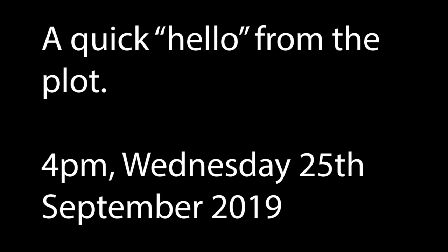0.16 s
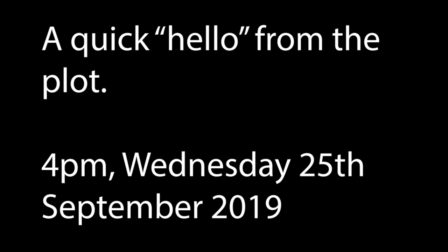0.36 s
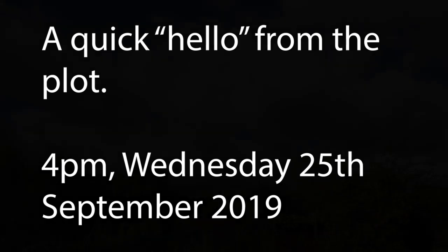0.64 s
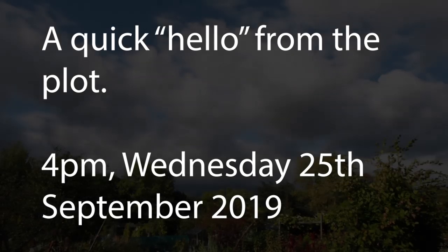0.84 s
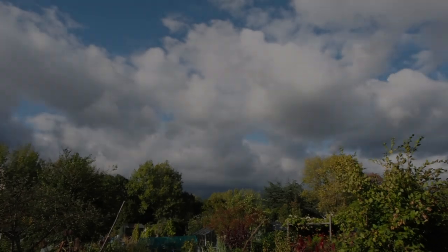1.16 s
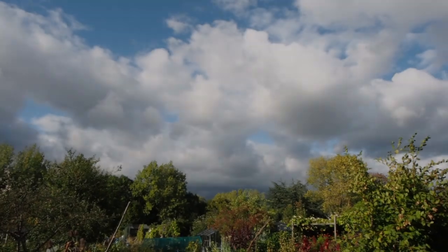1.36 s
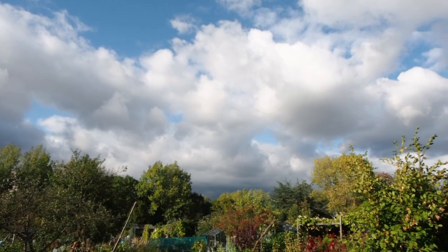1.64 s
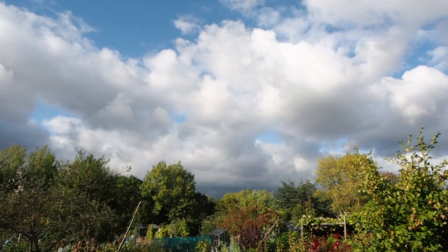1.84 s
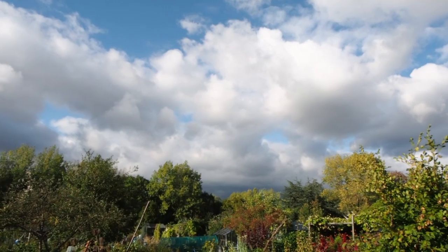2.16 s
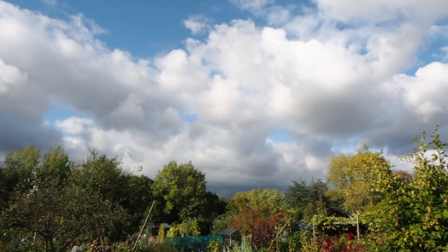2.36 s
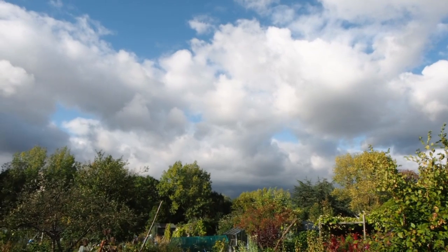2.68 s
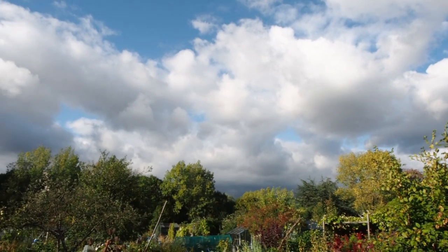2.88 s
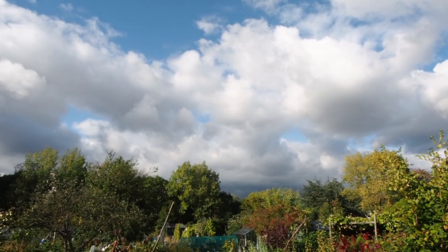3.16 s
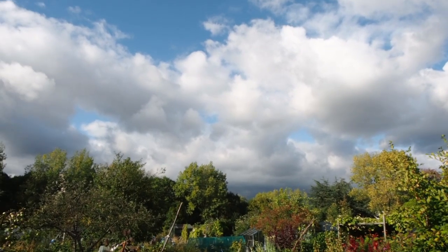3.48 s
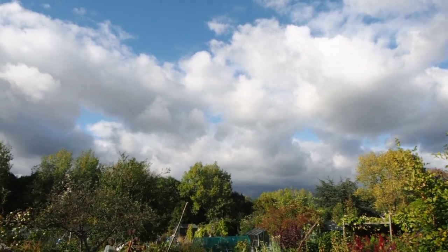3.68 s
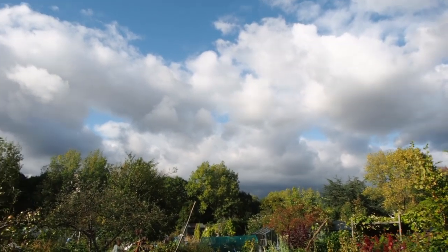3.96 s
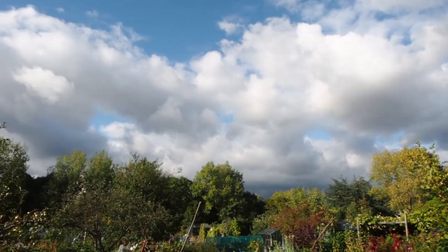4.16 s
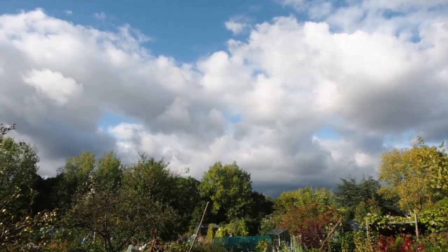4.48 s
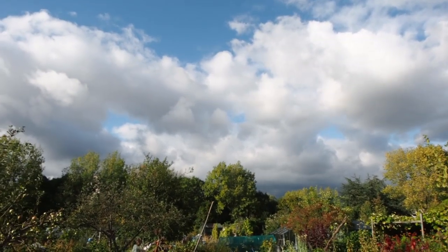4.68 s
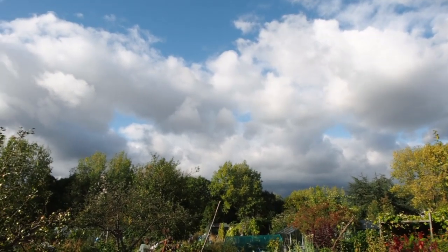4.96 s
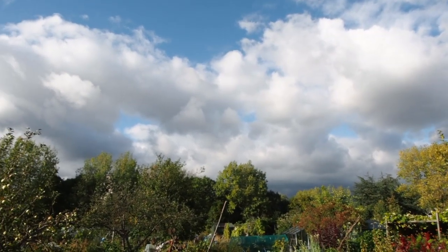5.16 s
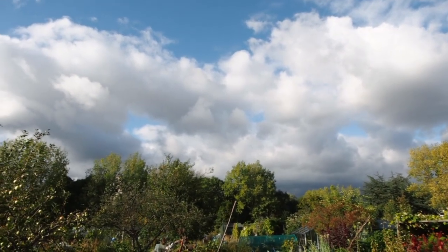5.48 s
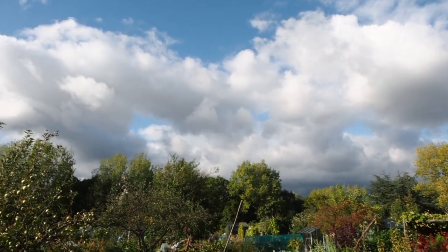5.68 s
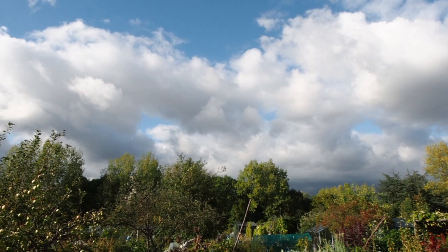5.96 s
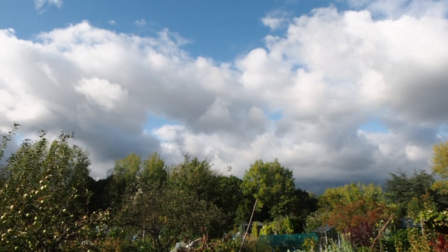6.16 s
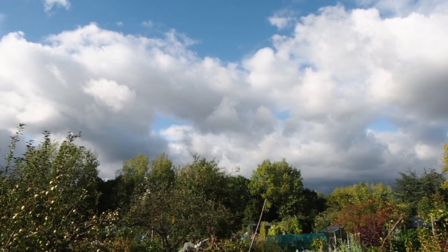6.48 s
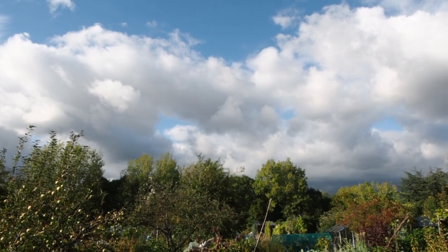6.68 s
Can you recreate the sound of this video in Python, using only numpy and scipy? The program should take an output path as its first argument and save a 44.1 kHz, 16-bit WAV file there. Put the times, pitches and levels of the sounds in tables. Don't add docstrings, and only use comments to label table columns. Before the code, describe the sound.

After brief silence, low wind buffeting fades in over rustling trees and faint far traffic, then calms, with a few tiny bird chirps.

```python
import sys
import numpy as np
from scipy import signal
from scipy.io import wavfile
from scipy.ndimage import uniform_filter1d

SR = 44100
rng = np.random.default_rng(int(sys.argv[2]) if len(sys.argv) > 2 else 0)


def natural_amplitude(level_db):
    exponent = np.asarray(level_db, float) / 20
    return 10 ** exponent


def inscribe(sig):
    pcm = np.round(np.clip(np.atleast_2d(sig).T, -1, 1) * 32767)
    wavfile.write(sys.argv[1], SR, pcm.astype(np.int16))


N = 301203
FRAME, HOP = 1024, 256


def evened(x):
    return x / np.sqrt(np.mean(x ** 2) + 1e-20)


def read(points, hz):
    table_hz, value = np.transpose(points)
    return np.interp(np.log(hz + 1), np.log(table_hz + 1), value)


def follow(rows):
    s, *columns = np.transpose(rows)
    return np.array([np.interp(np.arange(N) / SR, s, column) for column in columns])


def add(mix, s, sound):
    part = mix[round(s * SR):][:len(sound)]
    part += sound[:len(part)]


def wander(ms):
    size = max(int(ms * SR / 1000), 2)
    noise = rng.standard_normal((2, N))
    return evened(uniform_filter1d(uniform_filter1d(noise, size), size))


# frequency in Hz, gain in dB.
PORT_COLOUR = [(4000, -0.5), (7000, -1.5), (8400, 1.5), (10500, 0.5), (13000, -0.5)]


def airy(colour, same, right_leads, patchy_db, tilt_db):
    frames = N // HOP + 5
    hz = np.fft.rfftfreq(FRAME, 1 / SR)
    a, b, c, d, patches = rng.standard_normal((frames, len(hz), 5)).T
    patches = uniform_filter1d(patches, size=14, axis=0)
    patches = evened(uniform_filter1d(patches, size=12, axis=1))

    left = a + 1j * b
    unrelated = c + 1j * d
    like = np.clip(read(same, hz), 0, 1)[:, None]
    early = np.exp(2j * np.pi * hz * right_leads / SR)[:, None]
    spectra = np.array([left, like * early * left + np.sqrt(1 - like ** 2) * unrelated])
    spectra[1] *= natural_amplitude(read(PORT_COLOUR, hz))[:, None]

    octaves = np.log2(hz[:, None] / 4000 + 0.078)
    tilt = octaves * np.interp(np.arange(frames) * HOP, np.arange(N), tilt_db)
    spectra *= natural_amplitude(read(colour, hz)[:, None] + patchy_db * patches + tilt)
    return evened(signal.istft(spectra, nperseg=FRAME, noverlap=FRAME - HOP)[1][:, :N])


# middle in seconds, half length in seconds, strength in dB.
PUFFS_LEFT = [(.9, 0.091, -36), (1.05, 0.032, -30.5), (1.14, 0.098, -31), (1.28, 0.033, -30),
              (1.41, 0.057, -28.5), (1.57, .05, -34), (1.69, .025, -28.5), (1.78, .04, -50),
              (1.87, 0.043, -40), (1.99, 0.042, -37), (2.07, .02, -37), (2.18, 0.074, -28.5),
              (2.3, 0.036, -33), (2.38, 0.045, -35.5), (3.14, 0.097, -33), (3.47, 0.095, -33.5),
              (3.65, 0.087, -36), (3.87, 0.065, -41.5), (4.7, .1, -60), (5.5, .02, -42), (5.59, .04, -45),
              (5.72, 0.032, -39), (5.83, 0.053, -37.5), (6.1, 0.052, -36), (6.22, 0.042, -42),
              (6.35, 0.043, -42.5), (6.52, .02, -44.5), (6.63, 0.085, -41.5)]
PUFFS_RIGHT = [(1.06, .1, -48), (1.55, 0.26, -45), (2.05, 0.056, -36.5), (2.32, 0.045, -38),
               (2.8, .03, -48), (2.93, 0.098, -35.5), (3.12, 0.052, -26), (3.22, .05, -29.5),
               (3.33, 0.1, -35), (3.6, 0.065, -36), (3.76, 0.063, -42), (3.92, .08, -39),
               (4.12, 0.042, -45), (4.58, 0.037, -42), (5.05, .1, -63), (5.8, 0.17, -55), (6.25, 0.16, -55),
               (6.75, .06, -60)]


def wind_db():
    calm_db = -67
    t = np.arange(0, N, HOP) / SR
    strength = []
    for puffs in (PUFFS_LEFT, PUFFS_RIGHT):
        power = natural_amplitude(2 * calm_db)
        for middle, half, db in puffs:
            power = power + natural_amplitude(2 * db) * np.exp(-((t - middle) / half) ** 2 * 2)
        strength.append(np.interp(np.arange(N) / SR, t, 10 * np.log10(power)))
    return np.array(strength)


def eddy(level_db, hz, ms, luck):
    t = np.arange(-1500, 1500) / SR
    width = 0.47 * np.sqrt(max(ms ** 2 - 30, 9)) / 1000
    glide = 1 + 0.29 * (luck[0] - .5) * t / width
    turn = 2 * np.pi * (hz * t * glide + luck[1])

    def burst(phase, spread):
        return np.cos(phase) * np.exp(-.5 * (t / spread) ** 2)

    swirl = burst(turn, width)
    edge = burst(2 * turn + 6.6 * luck[2], min(0.76 * width, .0022))
    crest = burst(3.16 * turn + 7.1 * luck[3], min(.5 * width, .0012))
    push = burst(0.54 * turn + 5.1 * luck[4], 1.47 * width)
    sharp = natural_amplitude(0.16 * (level_db + 29.5))
    pulse = swirl + 0.3 * sharp * edge + 0.14 * sharp ** 0.88 * crest + 0.53 * push
    return natural_amplitude(level_db + 3.5) * pulse


def small_eddies(strength_db):
    gap_s, low_hz, high_hz = .017, 124, 250
    over_db, scatter_db, cycles = 3.5, 13.5, 1.73
    octaves_per_db = 0.05
    slots = np.arange(10 * gap_s, N / SR - 2 * gap_s, gap_s)
    late, weak, pitch, long = rng.random((len(slots), 4)).T
    s = slots + late * gap_s
    here_db = strength_db[(s * SR).astype(int)]
    hz = low_hz * (high_hz / low_hz) ** pitch * 2 ** (octaves_per_db * (here_db + 30))
    level_db = here_db + over_db - scatter_db * weak
    ms = 1000 * cycles * (.5 + long) / hz
    return list(zip(s, level_db, hz, ms))


# middle in seconds, level in dB,
# pitch in Hz, length in ms.
EDDIES_LEFT = [(0.941, -24.5, 123, 7.9), (1.072, -24.5, 175, 8), (1.109, -21.5, 175, 9),
               (1.133, -22.5, 244, 7.1), (1.203, -24.5, 135, 11.5), (1.222, -25, 193, 12),
               (1.253, -22, 307, 4.9), (1.352, -26.5, 167, 7.4), (1.376, -25, 196, 9.1),
               (1.398, -15, 165, 8.5), (1.435, -18, 324, 11), (1.474, -24.5, 139, 10),
               (1.546, -27.5, 149, 7.5), (1.685, -22.5, 126, 10), (1.701, -15.5, 115, 9.8),
               (2.158, -13.5, 165, 8.9), (2.176, -19.5, 216, 9.2), (2.21, -21, 140, 10),
               (2.232, -17, 187, 9.3), (3.183, -22.5, 161, 11), (3.336, -21.5, 202, 6.5),
               (3.376, -21.5, 276, 7), (3.4, -22.5, 190, 12.5), (3.444, -21.5, 216, 6.4),
               (3.579, -25, 145, 12), (3.661, -33, 112, 14), (3.717, -18.5, 163, 9.5),
               (3.742, -30, 191, 7.8), (4.706, -39, 496, 7.2), (5.712, -30, 138, 7.6)]
EDDIES_RIGHT = [(1.339, -33, 148, 8), (1.617, -30, 184, 10.6), (1.655, -30.5, 187, 6.3),
                (1.939, -32.5, 139, 7.8), (2.094, -22.5, 179, 7.5), (2.27, -33, 129, 18),
                (2.786, -34, 180, 11), (2.867, -34, 175, 12), (2.886, -19.5, 290, 4.4),
                (2.942, -25, 179, 7.8), (2.957, -17.5, 213, 8), (2.987, -22, 266, 7.8),
                (2.999, -14, 267, 5.5), (3.038, -25, 271, 6.1), (3.078, -15.5, 286, 6.5),
                (3.089, -16, 190, 6.2), (3.096, -13, 297, 5.5), (3.108, -19, 360, 12.5),
                (3.151, -23, 144, 6.6), (3.162, -23, 129, 12), (3.176, -19, 286, 6), (3.186, -25, 318, 7.7),
                (3.222, -29, 190, 5.6), (3.238, -23, 179, 6.9), (3.294, -36, 155, 8),
                (3.349, -26, 157, 8.7), (3.372, -26, 183, 9), (3.386, -25.5, 262, 4.9),
                (3.494, -31, 208, 7.1), (3.802, -32, 164, 10)]


def buffets():
    out = np.zeros((2, N))
    for port, hard, strength_db in zip(out, (EDDIES_LEFT, EDDIES_RIGHT), wind_db()):
        rows = small_eddies(strength_db) + list(hard)
        for (s, *shape), luck in zip(rows, rng.random((len(rows), 5))):
            add(port, s - 1500 / SR, eddy(*shape, luck))
    return out


# frequency in Hz, density in dB per Hz.
FLOW_COLOUR = [(15, -28), (40, -32), (70, -4), (105, 13), (140, -4.5), (190, -4), (300, -16), (450, -27),
               (900, -61), (2500, -85)]


def flow():
    unrelated = [(10, 0), (20, 0)]
    rumble = airy(FLOW_COLOUR, unrelated, right_leads=0, patchy_db=0.1, tilt_db=np.zeros(N))
    return rumble * natural_amplitude(wind_db() + 2.4 * wander(ms=37) - 2.0)


def wind_on_ports():
    limit = 0.35
    low_cut = signal.butter(2, 62., "highpass", fs=SR, output="sos")
    wind = signal.sosfilt(low_cut, flow() + buffets())
    return limit * np.tanh(wind / limit)


# time in seconds, leaf level in dB, brightness in dB, left over right in dB.
BREEZE = [
    (0.9, -46, 0.5, -2),
    (1.31, -45.5, 0.5, -2),
    (3.24, -46.5, 0, -1.5),
    (3.39, -44.5, 0, -0.5),
    (3.53, -45.5, 1, 0),
    (4.15, -47, 0.5, -1.5),
    (4.81, -47, 1, -0.5),
    (5.46, -47.5, 1, -1),
    (6.81, -46, 1.5, -1.5),
    (6.83, -45.5, 3.5, -3),
]
# frequency in Hz, density in dB per Hz.
LEAVES = [(300, -20), (900, -14.5), (1400, 0), (2000, 0.5), (2700, 0), (3700, -3), (5200, -8.5),
          (6500, -10.5), (7400, -10.5), (8400, -9), (9500, -11), (10700, -16), (12500, -21), (15700, -25.5)]
# frequency in Hz, likeness of the ports from 0 to 1.
LEAVES_SAME = [(1500, .2), (2100, .4), (2900, .47), (3500, .53), (5000, .55), (6300, .2), (10000, .18),
               (12000, .06)]


def leaves():
    level_db, bright_db, pan_db = follow(BREEZE)
    hiss = airy(LEAVES, LEAVES_SAME, right_leads=4.92, patchy_db=-0.08, tilt_db=bright_db)
    flutter_db = 0.31 * wander(ms=46)[0] + 0.39 * wander(ms=2.8)
    return hiss * natural_amplitude(level_db + flutter_db + np.outer([.5, -.5], pan_db) + 4.0)


# start in seconds, length in ms, first pitch in Hz, last pitch in Hz, level in dB.
CHIRPS = [(1.165, 16, 3700, 3400, -59), (1.203, 27, 3550, 3580, -56), (1.250, 19, 3100, 3050, -55),
          (3.956, 14, 3300, 5150, -57), (3.966, 31, 5200, 5130, -52), (3.998, 10, 4000, 4500, -56),
          (4.012, 14, 3900, 3380, -53), (4.030, 15, 3300, 4050, -54), (4.041, 12, 3980, 4050, -44),
          (4.048, 6, 4100, 4570, -52), (5.957, 14, 3780, 3900, -53), (5.993, 12, 3100, 4200, -51.5),
          (6.021, 12, 4200, 3850, -51), (6.030, 10, 4350, 3800, -52), (6.042, 12, 3920, 3600, -50),
          (6.512, 25, 3400, 2900, -54), (6.543, 34, 3310, 2890, -52)]


def bird():
    song = np.zeros(N)
    for s, ms, start_hz, end_hz, level_db in CHIRPS:
        hz = np.linspace(start_hz, end_hz, int(ms * SR / 1000))
        whistle = np.sin(2 * np.pi * np.cumsum(hz) / SR) * signal.windows.tukey(len(hz), .6)
        add(song, s, natural_amplitude(level_db + 10.5) * whistle)
    song *= natural_amplitude(2.1 * wander(ms=3.0)[0] - 1.5)

    t = np.arange(4000) / SR
    sparse = rng.random((2, len(t))) < .02
    echoes = rng.standard_normal((2, len(t))) * sparse * natural_amplitude(-22 - 60 * t / .12)
    direct = natural_amplitude([[-8], [0]]) * np.array([np.roll(song, 3), song])
    return direct + signal.oaconvolve(song[None], echoes)[:, :N]


# time in seconds, level in dB.
ROAD = [
    (.9, -44),
    (2, -42.5),
    (3, -43),
    (3.7, -42.5),
    (4.3, -42.5),
    (5, -42.5),
    (5.6, -42.5),
    (6.2, -43),
    (6.83, -43),
]
# frequency in Hz, density in dB per Hz.
ROAD_COLOUR = [(20, -23), (45, -8.5), (100, -11.5), (160, -3.5), (250, -7), (350, -4), (450, -9.5),
               (560, -3.5), (800, 1), (1000, 1.5), (1150, -2.5), (1330, -14), (1800, -10.5), (9000, -59)]
# frequency in Hz, likeness of the ports from 0 to 1.
ROAD_SAME = [(60, 1), (200, 0.96), (700, 0.85), (1100, 0.74), (2000, 0.76)]


def road():
    roar = airy(ROAD_COLOUR, ROAD_SAME, right_leads=-2.1, patchy_db=1.1, tilt_db=np.zeros(N))
    return roar * natural_amplitude(follow(ROAD)[0] + np.array([[1.8], [1.1]]))


def scene():
    return wind_on_ports() + leaves() + bird() + road()


def band_limit(x):
    return signal.sosfilt(signal.butter(12, 15730, fs=SR, output="sos"), x)


def record(dry):
    fade_start, fade_s, offset = 0.67, 0.87, -0.0031
    progress = np.clip((np.arange(N) / SR - fade_start) / fade_s, 0, 1)
    fade = np.sin(np.pi / 2 * progress)
    return band_limit((dry + offset) * fade)


dry = scene()
out = record(dry)
inscribe(out)
```